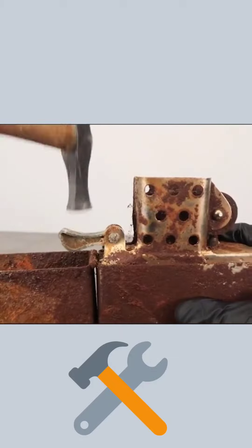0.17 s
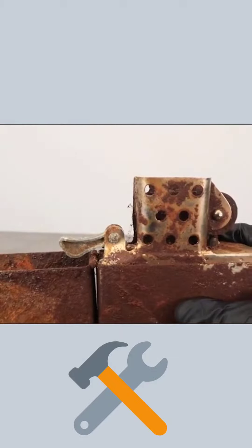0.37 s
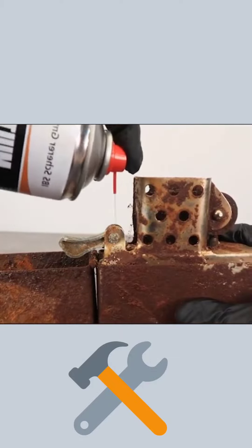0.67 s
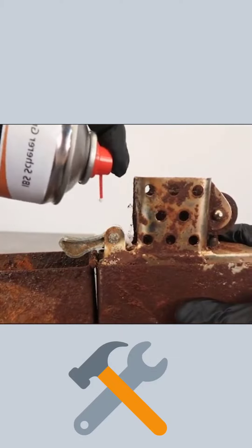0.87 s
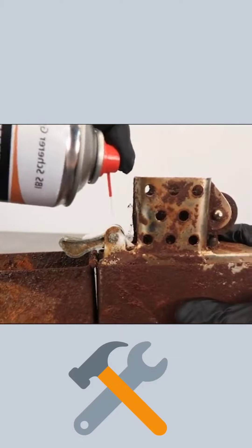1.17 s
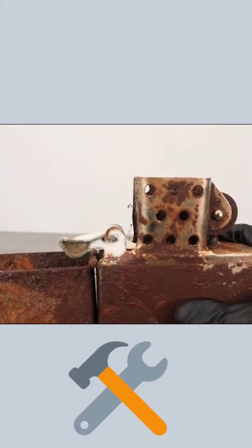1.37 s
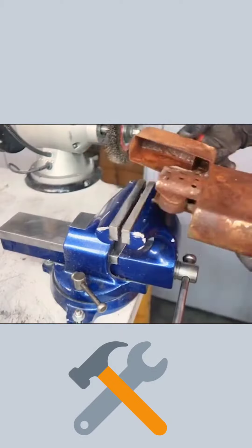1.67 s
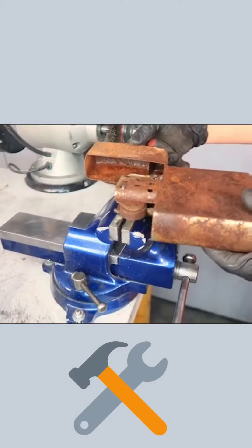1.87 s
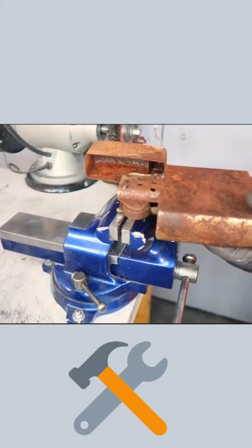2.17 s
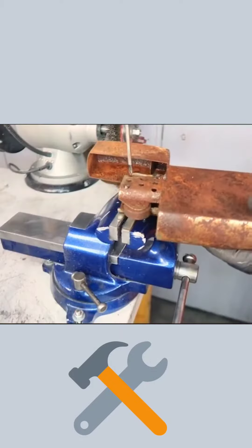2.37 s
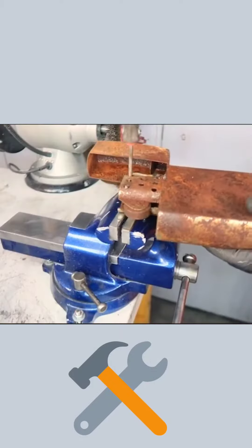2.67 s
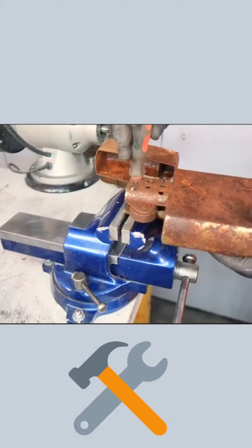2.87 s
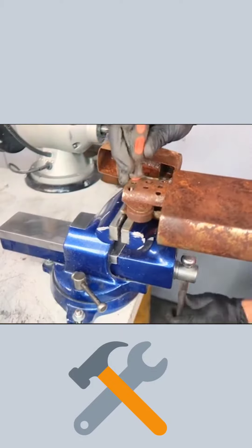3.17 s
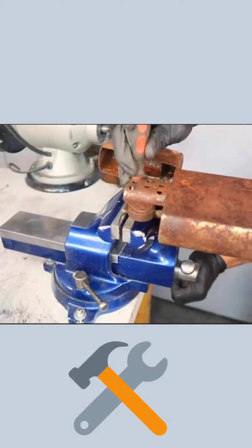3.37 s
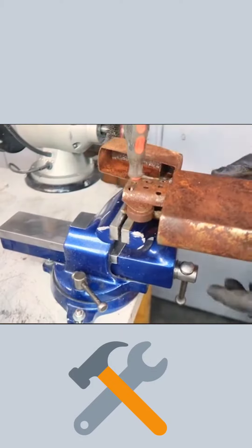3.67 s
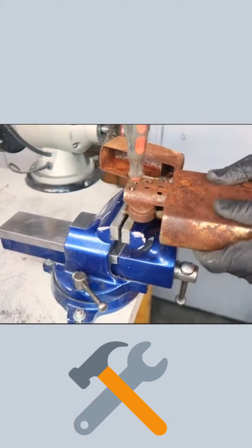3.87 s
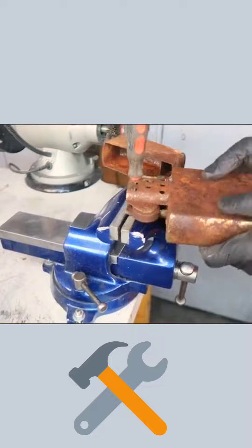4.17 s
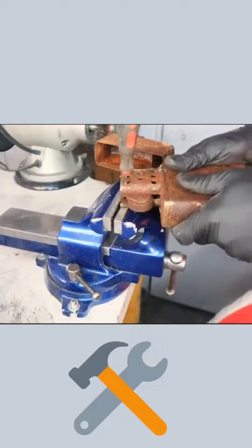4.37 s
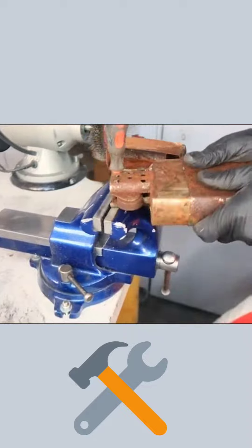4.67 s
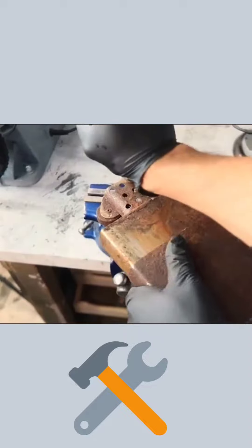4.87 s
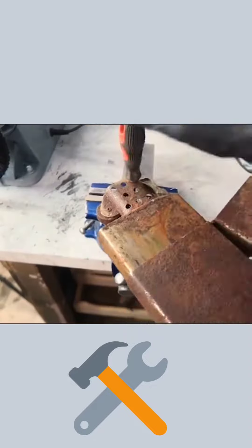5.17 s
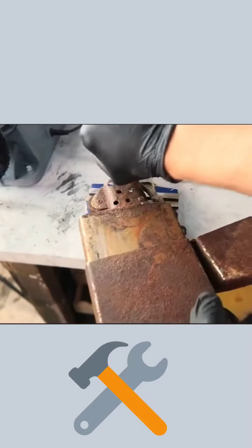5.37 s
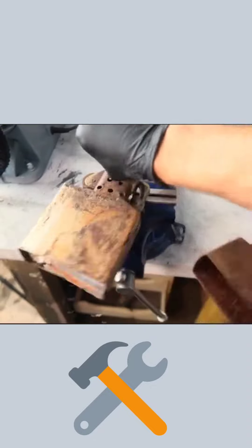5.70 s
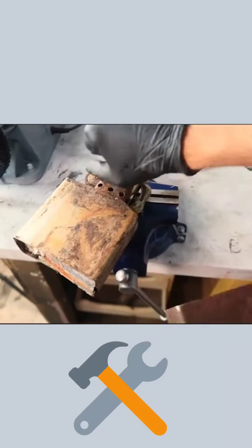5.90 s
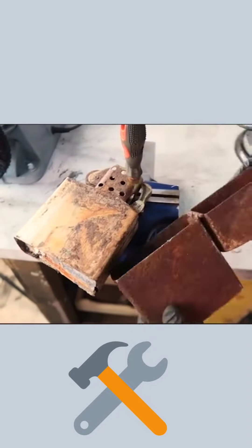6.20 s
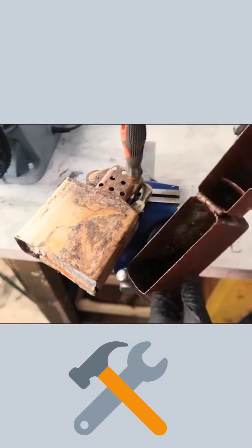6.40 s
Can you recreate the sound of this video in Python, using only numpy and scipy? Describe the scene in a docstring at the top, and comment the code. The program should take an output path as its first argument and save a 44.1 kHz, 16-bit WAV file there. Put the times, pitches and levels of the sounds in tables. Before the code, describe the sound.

A quiet small workshop, close and dry, almost mono, with low airy noise. From 0 to 0.4 s a small hammer raps a rusty steel latch seven times, about sixteen per second, each with a tiny softer bounce and short ring. Very faint oil spits come at 0.55 and 1.1-1.5 s; a thin high whine gives way to faint hum around 1.5. From 1.8 sparse dull clicks, then scrapes at 2.5 and brighter skids and a shift near 2.8. Light handle clinks at 3.1-3.3, a strong one at 3.6. A scrape at 3.8 leads into rapid to-and-fro squeaky rocking, 3.95-4.25, fading into small skids by 4.4. A thump and shift at 4.65. Lever knocks at 4.95 and 5.45, a hard clack at 5.38, another at 5.62. The loudest crunching jolts hit at 5.72-5.77, then a bright snap at 5.84 and a weaker one at 5.93. Faint scrape and knock near 6.2, then quiet.

```python
"""A big rusty steel case, heard close up, is tapped, clicked, scraped and levered until it knocks and snaps free.
Each contact is an impulse and a crunch exciting damped modes and a dense wash; scraping is a train of such slips.
A small hammer first taps the latch in a quick run, bouncing once per tap; single damped sines are thuds and a ting.
Oil spray and glove rustles are crinkling, coloured noise that rings nothing.
A quiet workshop lies underneath: coloured noise, a narrow band of noise as a thin whine, then two sines as hum."""
import sys
import numpy as np
from scipy import signal
from scipy.fft import rfft, irfft, next_fast_len
from scipy.io import wavfile

SR = 44100
rng = np.random.default_rng(int(sys.argv[2]) if len(sys.argv) > 2 else 0)


def dump_mix(stems):
    """Bounce the given channels to the path in sys.argv[1] as a 16-bit WAV at rate SR."""
    frames = np.atleast_2d(stems).T  # one column per channel
    limited = np.clip(frames, -1, 1)  # hard clip at full scale
    pcm = np.round(limited * 32767).astype(np.int16)
    wavfile.write(sys.argv[1], SR, pcm)


N = 288414  # samples
RING_LENGTH = 12000  # samples
TOP_HZ = 15800

# Workshop noise at the bench, then at the vise [f/Hz, relative density/dB per Hz]
BENCH_AIR = [(25, -32.5), (70, -9.5), (110, -21), (185, 1.5), (260, -15.5), (360, -8), (500, -17),
             (1100, -20), (3000, -28.5), (11800, -33.5), (12800, -43.5), (15500, -48)]
VISE_AIR = [(30, -19.5), (70, -11), (140, -12.5), (215, -5.5), (300, -18), (470, -10.5), (1000, -13),
            (2000, -18.5), (3000, -21), (4600, -20.5), (6000, -25.5), (11500, -24.5), (13000, -42),
            (15500, -54)]
BENCH_DB, VISE_DB = -67.5, -71
# Hum of the workshop at the vise [f/Hz, rms level/dB]
HUM = [(215.3, -82), (473.7, -81.5)]
# Thin whine at the bench
WHINE_HZ, WHINE_DB = 12000, -85.5

# Gain of the side signal: work on the case, levering and wrenching, workshop [f/Hz, side gain/dB]
WIDTH = [(60, -23.5), (380, -30.5), (700, -23), (4400, -27), (15000, -15)]
LEVER_WIDTH = [(60, -17), (380, -31.5), (700, -15.5), (1290, -19), (4400, -22.5), (15000, -7.5)]
AIR_WIDTH = [(200, -28.5), (380, -12.5), (1290, 1)]

# Oil puffs and glove rustles [strongest moment t/s, length/s, level/dB, hardness/dB]
PUFFS_AND_RUSTLES = [(0.549, 0.076, -69, 2.5), (1.112, 0.016, -77.5, 16.5), (1.18, 0.11, -82.5, 6),
                     (1.401, 0.065, -68.5, -5.5), (1.469, 0.033, -69.5, 4.5), (2.142, 0.1, -83.5, 18.5),
                     (3.234, 0.028, -64.5, -2), (4.261, 0.059, -61.5, 2.5), (5.14, 0.1, -57.5, 1.5),
                     (5.29, 0.1, -68, 7.5), (5.836, 0.051, -52.5, 10)]
# Colour of the soft hiss [f/Hz, relative level/dB]
PUFF_COLOUR = [(50, -26), (183, -3), (368, 3.5), (500, -11), (1350, -14), (1960, -32), (7900, -23),
               (15500, -20.5)]
CRINKLES_PER_S, CRINKLE_DB = 250, 4.5

# Bumps of the case in the jaws [t/s, peak level/dB, f/Hz, T60/s]
BODY_THUDS = [(1.842, -46.5, 610, 0.11), (3.942, -37.5, 645, 0.13), (4.022, -38, 658, 0.11),
              (4.105, -30.5, 402, 0.18), (4.662, -35.5, 208, 0.097), (4.668, -25, 385, 0.05),
              (5.7665, -14, 600, 0.015), (6.262, -44, 417, 0.09)]
# A faint high ting of the steel [t/s, peak level/dB, f/Hz, T60/s]
TINGS = [(1.549, -70, 4400, 0.22)]
NOTE_RISE_S = 0.0028

# Hammer taps [t/s, level/dB, hardness/dB, bounce against tap/dB, low boom/dB, clear note/dB]
HAMMER_TAPS = [(0.002, -39, -3, -14, -11.5, 4), (0.0557, -33.5, 1.5, -9.5, -21.5, -5),
               (0.1189, -33.5, 0.5, -8.5, -9, 2), (0.1845, -35, 1, -9.5, -7.5, -5.5),
               (0.245, -35.5, 0.5, -19, -11, -5), (0.308, -34, 2, -8, -3.5, 1.5),
               (0.3695, -34, 1.4, -3.5, -11, 4.5)]
# Change of the latch's high ring along the run [t/s, gain/dB]
LATCH_RING = [(0, 0), (0.055, 2), (0.37, -6.5)]
BOOM_HZ, BOOM_T60_S, NOTE_HZ, NOTE_T60_S = 295, 0.1, 1123, 0.075
# One bounce follows each tap; it is softer
BOUNCE_S, BOUNCE_HARDNESS_DB = 0.0125, -2

# Blows: a harder contact is brighter and cracks more sharply [t/s, level/dB, hardness/dB]
TOOL_CLICKS = [(1.837, -47.5, -5), (1.866, -67, -5), (2.035, -49.5, -1.5), (2.335, -49, 3),
               (2.4115, -51, -3), (2.6707, -45, 18.5), (2.677, -41.5, 4.5), (2.727, -61.5, 11.5),
               (2.922, -68, 6), (2.962, -68.5, 12.5), (2.989, -56.5, -4), (3.292, -62.5, 6.5),
               (3.502, -55, 2), (3.5754, -44.5, 1.5), (3.6073, -28.5, 4.5), (4.099, -50.5, -3),
               (4.427, -48, 0), (4.82, -65, 0)]
HANDLE_CLINKS = [(3.085, -48, -1), (3.275, -48, -0.34), (3.329, -50, 0), (3.576, -37.5, -1.9),
                 (3.607, -25, 0.91)]
LEVER_KNOCKS = [(4.948, -31.5, -2), (4.963, -42, -6.5), (5.108, -48.5, 1), (5.4447, -27.5, -0.5),
                (5.4495, -33, -6)]
BLADE_CLACKS = [(5.038, -61.5, -2.5), (5.187, -57.5, -1), (5.272, -58, -7), (5.378, -22.5, 0.3),
                (5.617, -31.5, 0)]
JOINT_SNAPS = [(5.826, -39.5, -14.5), (5.8448, -18.5, 2), (5.9266, -29.5, -0.5), (6.257, -41.5, -7.5)]
WRENCH_JOLTS = [(5.7225, -34, 0), (5.7405, -30, 2.5), (5.7475, -23.5, 2.5), (5.764, -21, 4),
                (5.769, -32, -2)]
# Delay of the dull settling after each click or clack
SETTLE_S = 0.015

# Strokes [strongest moment t/s, length/s, level/dB, hardness/dB]
TOOL_SCRAPES = [(2.529, 0.033, -44.5, 6), (2.563, 0.067, -44, 6.5), (2.618, 0.044, -56.5, -4.5),
                (2.974, 0.026, -48.5, 5), (3.795, 0.056, -31, -3.5), (3.897, 0.051, -39.5, -2)]
CASE_SHIFTS = [(2.845, 0.052, -31, 4), (2.872, 0.038, -51, -7), (3.032, 0.04, -58.5, -3),
               (3.272, 0.029, -52, 5.5), (3.588, 0.026, -39.5, 1.5), (4.484, 0.024, -52, -1.5),
               (4.659, 0.03, -26, 5), (4.677, 0.024, -35, -8), (4.712, 0.075, -47.5, -6),
               (4.788, 0.026, -58.5, -9), (6.178, 0.06, -56.5, -3)]
LEVER_GRINDS = [(5.3, 0.05, -61.5, -5.5), (5.55, 0.038, -54.5, 1.4)]
WRENCH_GRINDS = [(5.735, 0.022, -26, -1)]
# Light skids of the blade, all equally short [strongest moment t/s, level/dB, pitch ratio of the high ring]
BLADE_SKIDS = [(2.804, -48.5, 1), (2.037, -38.5, 1.08), (2.818, -29, 0.98), (2.844, -23, 0.86),
               (2.987, -39, 1.04), (4.102, -18.5, 0.97), (4.181, -21, 0.98), (4.278, -45.5, 0.92),
               (4.305, -33, 0.98), (4.341, -36, 0.87), (4.405, -37, 0.9), (4.694, -28, 0.9),
               (4.708, -30, 0.92), (4.784, -50.5, 0.93), (5.449, -19.5, 1.09)]
SKID_S = 0.0099
# The blade grinds before each clack: lead of the strongest moment, length, level against the clack
GRIND_LEAD_S, GRIND_S, GRIND_DB = 0.0041, 0.014, -20
# The tool is worked to and fro: a push, then a weaker and duller pull back
ROCK_FROM_S, ROCK_PERIOD_S, ROCK_STROKE_S = 3.947, 0.0775, 0.038
PULL_AFTER_S, PULL_DB, PULL_HARDNESS_DB, PULL_PITCH_RATIO = 0.036, -4, -1.5, 0.97
# Effort of the rocking [t/s, push level/dB]
ROCK_EFFORT = [(3.947, -28), (4.1, -28), (4.215, -37)]

# Nominal modes of each part [f/Hz, relative energy/dB, T60/s]
LATCH_MODES = [(421, -14, 0.06), (555, -1.5, 0.06), (708, -7, 0.065), (936, -8, 0.06), (1390, -5, 0.07),
               (1670, -11, 0.06), (2196, -18, 0.05), (3987, -16, 0.04), (4250, -2, 0.04), (4328, 0, 0.04),
               (4414, -8, 0.04)]
CASE_MODES = [(396, -3, 0.11), (580, -14, 0.09), (660, -10, 0.09), (740, -13, 0.08), (810, -10, 0.09),
              (920, -13, 0.08), (1140, -11, 0.09), (1298, -4, 0.11), (1380, -8, 0.08), (1690, -13, 0.07),
              (1990, -9, 0.09), (3930, -14, 0.05), (4160, -6, 0.05), (4460, -2, 0.06), (4590, -6, 0.06),
              (4710, -4, 0.07), (6830, -8, 0.04), (7370, -6, 0.04), (7810, -6, 0.04)]
HANDLE_MODES = [(1154, -8, 0.08), (1293, 0, 0.1), (1400, -3, 0.06), (1560, -4, 0.05)]
LEVERED_MODES = [(222, -18, 0.09), (413, 1.5, 0.125), (482, -12, 0.07), (555, -6, 0.08), (670, -11, 0.08),
                 (917, -12, 0.07), (1010, -4, 0.08), (1168, -2, 0.08), (1300, -7, 0.07), (1500, -8, 0.06),
                 (1786, -14, 0.06), (4592, -8, 0.05), (4655, -3, 0.055), (4900, -7, 0.06)]
INSERT_MODES = [(405, -2, 0.05), (490, -4, 0.05), (560, -6, 0.05), (740, -7, 0.06), (1168, -9, 0.06),
                (1540, -6, 0.06), (1786, -10, 0.06), (2630, -4, 0.06), (2858, -3, 0.09), (2960, -3, 0.07),
                (4592, -6, 0.045), (4660, 0, 0.055), (7100, -7, 0.06)]
JOINT_MODES = [(1003, -21, 0.06), (1296, -17, 0.13), (1800, -16, 0.06), (1950, -8, 0.055),
               (2510, -10, 0.05), (2856, 0, 0.055), (3330, -7, 0.035), (4447, -18, 0.06),
               (4926, -13, 0.035), (7050, -13, 0.045)]
# Colour of each contact's crack and wash of weaker modes [f/Hz, relative level/dB]
LATCH_COLOUR = [(60, -22.5), (150, -8.5), (300, -16.5), (550, 0.5), (1000, -8), (1500, -7.5), (2400, -15),
                (3700, -15.5), (4300, -7.5), (5000, -21), (10000, -8.5), (15500, -16.5)]
CASE_COLOUR = [(80, -25.5), (200, -24), (310, -20.5), (400, -0.5), (750, -7), (1400, 3.5), (2400, -2.5),
               (4400, -5), (6000, -1.5), (9800, 0.5), (12000, -5.5), (15500, -20.5)]
SCRAPE_COLOUR = [(120, -41.5), (280, -18.5), (400, -0.5), (900, 3), (1350, 0), (2000, -1), (2400, -7),
                 (3500, -7), (4050, 13), (4700, 12.5), (5100, -3.5), (7400, -1.5), (11000, -1),
                 (15500, -15)]
JAW_COLOUR = [(70, -30.5), (260, -13), (420, -1.5), (850, -3.5), (1450, 3), (2500, -10), (4300, -12),
              (5500, -8.5), (8500, -2.5), (15500, -10.5)]
LEVERED_COLOUR = [(60, -38.5), (150, -23.5), (300, -15.5), (450, -9), (800, -9), (1300, -1), (2100, -13.5),
                  (4000, -14.5), (4700, -7.5), (5400, -21), (7200, -17.5), (15500, -25)]
BLADE_COLOUR = [(150, -36), (750, -28), (1100, -1), (1500, 9), (2100, -10), (4000, -15.5), (4900, -9.5),
                (5700, -29.5), (15500, -35.5)]
INSERT_COLOUR = [(60, -29.5), (150, -18.5), (300, -12.5), (470, -3), (850, -9), (1550, -5), (2100, -12),
                 (2850, -3.5), (4000, -17.5), (4700, -4), (5400, -18), (7200, -11.5), (11000, -20),
                 (15500, -23.5)]
JOINT_COLOUR = [(150, -31.5), (600, -25.5), (1100, -11.5), (1950, -9), (2400, -7.5), (2900, 11), (3400, 4),
                (3750, -12), (5000, -9), (6400, -23.5), (7200, -14), (9000, -20), (11500, -14.5),
                (15500, -30)]
# Ring time of the weaker modes, before each contact's own scale [f/Hz, T60/s]
RING_TIME = [(250, 0.04), (700, 0.1), (1500, 0.073), (3500, 0.074), (7000, 0.06), (14000, .045)]

# Edges of the low, mid, ring and treble registers [f/Hz]
REGISTER_EDGES = [60, 750, 2200, 5500, 16000]
# Balance of each kind of contact, added to its level [low/dB, mid/dB, ring/dB, treble/dB]
TAP_BALANCE = (-2.5, 2, 2.5, -2)
CLICK_BALANCE = (-12, -3, -2, 2)
SETTLE_BALANCE = (-12.5, -17.5, -27.5, -23.5)
KNOCK_BALANCE = (0, 0.5, -4, -10)
CLACK_BALANCE = (-24.5, 1.5, -9, -15)
CLACK_SETTLE_BALANCE = (-20.5, -25, -36, -42)
SNAP_BALANCE = (-36.5, -9, 1, -11.5)
CLINK_BALANCE = (-19, 0.5, -12.5, -7.5)
SCRAPE_BALANCE = (-17.5, -9.5, -2.5, -8)
SKID_BALANCE = (-23.5, -17.5, -4.5, -19.5)
SHIFT_BALANCE = (-10, -1.5, -1.5, -2)
GRIND_BALANCE = (-1, -2, -8, -7)
WRENCH_BALANCE = (-2.5, -1.5, -0.5, -6.5)
PUFF_BALANCE = (-7.5, -7, -8.5, 1.5)
# Gain per dB of hardness [low, mid, ring, treble, each in dB/dB]
HARDNESS_TILT = (-1.76, -0.58, 0.35, 1.0)
HARDNESS_CRACK = 0.8  # dB of crack per dB of hardness


def undb(db):
    """Level definition: decibels to an amplitude ratio."""
    return 10 ** (np.asarray(db) / 20)


def unit(x):
    """Energy normalisation: each channel scaled to unit energy."""
    return x / np.sqrt(np.sum(x ** 2, axis=-1, keepdims=True) + 1e-30)


def decay(t, t60):
    """Exponential damping: the amplitude falls by 60 dB in the time t60."""
    return np.exp(-np.log(1000) * t / t60)


def along(points, size):
    """Logarithmic frequency scale: (Hz, value) points interpolated at the bins of a transform."""
    hz, value = np.transpose(points)
    bin_hz = np.fft.rfftfreq(size, 1 / SR)
    return np.interp(np.log(bin_hz + 1), np.log(hz), value)


def coloured(x, points):
    """Minimum-phase filtering: a causal response with the given (Hz, dB) curve, by folding the cepstrum."""
    n = x.shape[-1]
    size = 2 * next_fast_len(n // 2 + 1024)
    cepstrum = irfft(np.log(undb(along(points, size))))
    cepstrum[1:size // 2] *= 2
    cepstrum[size // 2 + 1:] = 0
    response = np.exp(rfft(cepstrum))
    return irfft(rfft(x, size) * response)[..., :n]


def registers(balance, level_db, hardness_db):
    """Contact stiffness: force lifts all four registers alike, hardness tilts them towards the treble."""
    return np.array(balance) + level_db + hardness_db * np.array(HARDNESS_TILT)


def voiced(x, register_db, seconds):
    """Band energy: the contact sets how strongly each register sounds, as mean power over the given time."""
    edges = np.array(REGISTER_EDGES)
    corners = np.column_stack([edges[:-1] * 1.2, edges[1:] / 1.2]).ravel()
    bins = (edges * x.shape[-1] / SR).astype(int)
    # the registers overlap at their edges, so the correction is repeated
    for _ in range(2):
        power = abs(rfft(x[0])) ** 2
        energy = np.add.reduceat(power, bins)[:-1] * 2 / x.shape[-1]
        gain_db = register_db - 10 * np.log10(energy / (seconds * SR) + 1e-20)
        x = coloured(x, np.column_stack([corners, np.repeat(gain_db, 2)]))
    return x


def add(out, s, x):
    """Superposition: mix x into out from time s on."""
    i = max(int(s * SR), 0)
    out[:, i:i + x.shape[1]] += x[:, :N - i]


def spread(mid_side, width):
    """Sum and difference stereo: mid and side to left and right, with the given side gain."""
    mid, side = mid_side[0], coloured(mid_side[1], width)
    return np.array([mid + side, mid - side])


def air(colour, db):
    """Stationary noise: a steady random signal of the given colour and rms level."""
    noise = rng.standard_normal((2, N))
    return unit(coloured(noise, colour)) * np.sqrt(N) * undb(db)


def workshop():
    """Ambient noise: hushed under the hammering, fuller during the oiling, then a faint hum at the vise."""
    t = np.arange(N) / SR
    bench = undb(np.interp(t, [.495, .51], [-8, 0]))
    at_vise = np.interp(t, [1.52, 1.54], [0, 1])
    hum_tones = sum(np.sqrt(2) * undb(db) * np.sin(2 * np.pi * hz * t) for hz, db in HUM)
    hum = np.outer([1, 0], hum_tones)
    whine_colour = [(20, -90), (WHINE_HZ - 250, -70), (WHINE_HZ, 0), (WHINE_HZ + 250, -70)]
    whine = air(whine_colour, WHINE_DB)
    bench_sound = bench * (air(BENCH_AIR, BENCH_DB) + whine)
    vise_sound = air(VISE_AIR, VISE_DB) + hum
    return (1 - at_vise) * bench_sound + at_vise * vise_sound


def pressure(length, rise_share, start_db, end_db):
    """Force envelope: a stroke swells to its strongest moment and lets go, linearly in decibels."""
    progress = np.linspace(0, 1, int(length * SR))
    return undb(np.interp(progress, [0, min(rise_share, 1), 1], [start_db, 0, end_db]))


def puffs():
    """Modulated noise: spits of oil spray and rustles of a glove, a soft crinkling hiss that rings nothing."""
    out = np.zeros((2, N))
    for s, length, level_db, hardness_db in PUFFS_AND_RUSTLES:
        flow = pressure(length, rise_share=0.4, start_db=-16, end_db=-20)
        steps = np.arange(len(flow)) * CRINKLES_PER_S / SR
        chance = rng.standard_normal(int(steps[-1]) + 2)
        crinkle = undb(CRINKLE_DB * np.interp(steps, np.arange(len(chance)), chance))
        hiss = flow * crinkle * rng.standard_normal((2, len(flow)))
        hiss = np.pad(hiss, ((0, 0), (0, RING_LENGTH)))  # room for the filters to die away
        register_db = registers(PUFF_BALANCE, level_db, hardness_db)
        add(out, s - np.argmax(flow) / SR, voiced(coloured(hiss, PUFF_COLOUR), register_db, length))
    return out


def notes(table):
    """Single damped mode: a soft push rings one note, low for a bump in the jaws, high for a graze."""
    out = np.zeros((2, N))
    t = np.arange(RING_LENGTH) / SR
    for s, level_db, hz, t60 in table:
        rise = (1 - np.exp(-t / NOTE_RISE_S)) ** 2
        ring = np.sin(2 * np.pi * hz * t) * rise * decay(t, t60)
        add(out, s, np.outer([1, 0], undb(level_db) * ring / abs(ring).max()))
    return out


def weak_modes(t, ring_scale):
    """High modal density: countless weak modes make noise whose damping depends on frequency."""
    noise = rfft(rng.standard_normal((2, RING_LENGTH)))
    wash = 0
    centres, times = np.transpose(RING_TIME)
    for share, t60 in zip(np.eye(len(centres)), times):
        band = irfft(noise * along(np.column_stack([centres, share]), RING_LENGTH))
        wash = wash + band * decay(t, t60 * ring_scale)
    # the room holds a faint, longer tail
    return wash + undb(-40.5) * rng.standard_normal((2, RING_LENGTH)) * decay(t, 0.35)


def clear_modes(t, modes):
    """Modal superposition: damped sines with random phase in mid and side."""
    hz, db, t60 = np.transpose(modes)[:, :, None]
    # grip and contact point shift every mode a little in pitch and level
    chance = rng.standard_normal((len(hz), 2, 1))
    shifted_hz = hz * (1 + 0.0067 * chance[:, 0])
    swing = np.exp(2j * np.pi * shifted_hz * t) * decay(t, t60)
    # low modes take longer to build up
    swing = swing * (1 - np.exp(-t * hz / 2))
    size = undb(db + 2.0 * chance[:, 1]) / np.sqrt(t60)
    phase = np.exp(2j * np.pi * rng.random((2, len(hz))))
    return np.imag(phase @ (size * swing))


def steel(modes, colour, crack_db, modes_db, ring_scale, crack_s):
    """Impulse response: mid and side of a part at one contact, as a crack, clear modes and a dense wash."""
    t = np.arange(RING_LENGTH) / SR
    wash = unit(coloured(weak_modes(t, ring_scale), colour))
    tones = unit(clear_modes(t, modes))
    ring = (wash + undb(modes_db) * tones) * (1 - np.exp(-t / 0.0026))
    # the contact is one sharp push, straight ahead, and a brief crunch of rust
    push = np.outer([1, 0], t == 0)
    crunch = unit(rng.standard_normal((2, RING_LENGTH)) * np.exp(-t / crack_s))
    crack = coloured(undb(-5.5) * push + crunch, colour)
    return unit(ring) + undb(crack_db) * unit(crack)


def blows(table, balance, modes, colour, crack_db, modes_db, ring_scale, crack_s):
    """Impact excitation: single contacts of steel on steel."""
    out = np.zeros((2, N))
    for s, level_db, hardness_db in table:
        hard_crack_db = crack_db + HARDNESS_CRACK * hardness_db
        hit = steel(modes, colour, hard_crack_db, modes_db, ring_scale, crack_s)
        add(out, s, voiced(hit, registers(balance, level_db, hardness_db), seconds=.03))
    return out


def scrapes(table, balance, modes, colour, crack_db, modes_db, slips_per_s, grit_db,
            rise_share, start_db, end_db):
    """Stick-slip: the edge catches on rust and slips over a thousand times a second; every slip rings the part."""
    out = np.zeros((2, N))
    for s, length, level_db, hardness_db in table:
        force = pressure(length, rise_share, start_db, end_db)
        n = len(force)
        moments = rng.random(n) < slips_per_s / SR
        signs = rng.choice([-1, 1], n)
        sizes = undb(grit_db * rng.exponential(size=n).clip(0, 4))
        slips = moments * signs * sizes
        response = steel(modes, colour, crack_db, modes_db, ring_scale=0.94, crack_s=0.0015)
        stroke = signal.fftconvolve((force * slips)[None], response, axes=1)
        register_db = registers(balance, level_db, hardness_db)
        add(out, s - rise_share * length, voiced(stroke, register_db, length))
    return out


def hammer():
    """Repeated impact: a quick run of taps on the latch, each with one bounce; the spot decides what rings."""
    out = np.zeros((2, N))
    for s, level_db, hardness_db, bounce_db, boom_db, note_db in HAMMER_TAPS:
        tap = (s, level_db, hardness_db)
        bounce = (s + BOUNCE_S, level_db + bounce_db, hardness_db + BOUNCE_HARDNESS_DB)
        modes = LATCH_MODES + [(BOOM_HZ, boom_db, BOOM_T60_S), (NOTE_HZ, note_db, NOTE_T60_S)]
        ring_db = np.interp(s, *np.transpose(LATCH_RING))
        balance = np.array(TAP_BALANCE) + ring_db * np.array([0, 0, 1, 0])
        out += blows([tap, bounce], balance, modes, LATCH_COLOUR,
                     crack_db=-4.0, modes_db=5, ring_scale=0.7, crack_s=0.0047)
    return out


def wrenching():
    """Clamped damping: the insert grinds out under full force, too tightly held for the body to ring on."""
    jolts = blows(WRENCH_JOLTS, WRENCH_BALANCE, INSERT_MODES, INSERT_COLOUR,
                  crack_db=-4.0, modes_db=1.5, ring_scale=0.75, crack_s=0.003)
    grinding = scrapes(WRENCH_GRINDS, WRENCH_BALANCE, INSERT_MODES, INSERT_COLOUR, crack_db=-2, modes_db=4,
                       slips_per_s=2800, grit_db=0.5, rise_share=0.6, start_db=-11.0, end_db=-11)
    return jolts + grinding


def settles(table):
    """Delayed contact: a blow of neutral hardness a moment after each row of the table."""
    return [(s + SETTLE_S, level_db, 0) for s, level_db, _ in table]


def levering():
    """Impact and stick-slip: the blade grinds and clacks in the gap, the case knocks and the joint snaps free."""
    knocks = blows(LEVER_KNOCKS, KNOCK_BALANCE, LEVERED_MODES, LEVERED_COLOUR,
                   crack_db=-7.5, modes_db=3.0, ring_scale=0.95, crack_s=0.0069)
    clacks = blows(BLADE_CLACKS, CLACK_BALANCE, LEVERED_MODES, BLADE_COLOUR,
                   crack_db=4, modes_db=-5.5, ring_scale=1.0, crack_s=0.0018)
    settling = blows(settles(BLADE_CLACKS), CLACK_SETTLE_BALANCE, LEVERED_MODES, LEVERED_COLOUR,
                     crack_db=-12.5, modes_db=1, ring_scale=0.87, crack_s=0.002)
    snaps = blows(JOINT_SNAPS, SNAP_BALANCE, JOINT_MODES, JOINT_COLOUR,
                  crack_db=2.5, modes_db=2.0, ring_scale=1.0, crack_s=0.00082)
    lead_ins = [(s - GRIND_LEAD_S, GRIND_S, level_db + GRIND_DB, hardness_db)
                for s, level_db, hardness_db in BLADE_CLACKS]
    grinding = scrapes(LEVER_GRINDS + lead_ins, GRIND_BALANCE, LEVERED_MODES, LEVERED_COLOUR,
                       crack_db=0.0, modes_db=8.5, slips_per_s=3200, grit_db=-0.5,
                       rise_share=0.38, start_db=-10.0, end_db=-19.0)
    return knocks + clacks + settling + snaps + grinding


def retuned(rows, ratio):
    """Moving boundary: the high ring shifts with the point where the blade bears; the low body stays put."""
    return [(hz * ratio if hz > 3000 else hz, *rest) for hz, *rest in rows]


def rocking(after_s, weaker_db, hardness_db, count):
    """Periodic forcing: strokes in one direction of the tool worked to and fro at a steady pace."""
    times = ROCK_FROM_S + after_s + ROCK_PERIOD_S * np.arange(count)
    efforts_db = np.interp(times, *np.transpose(ROCK_EFFORT))
    return [(s, ROCK_STROKE_S, effort_db + weaker_db, hardness_db) for s, effort_db in zip(times, efforts_db)]


def tool_strokes(table, ratio):
    """Friction-driven modes: the blade makes the case sing, at a slightly different pitch on every stroke."""
    out = np.zeros((2, N))
    modes = np.array(retuned(CASE_MODES, ratio))
    shifts = 1 + 0.014 * rng.standard_normal(len(table))
    for row, shift in zip(table, shifts):
        out += scrapes([row], SCRAPE_BALANCE, modes * [shift, 1, 1], retuned(SCRAPE_COLOUR, ratio),
                       crack_db=-2.0, modes_db=3.5, slips_per_s=1200, grit_db=4.0,
                       rise_share=0.41, start_db=-10, end_db=-23.5)
    return out


def blade_skids():
    """Brief stick-slip: light skids of the blade wake little but the high ring."""
    out = np.zeros((2, N))
    for s, level_db, ratio in BLADE_SKIDS:
        out += scrapes([(s, SKID_S, level_db, 0)], SKID_BALANCE,
                       retuned(CASE_MODES, ratio), retuned(SCRAPE_COLOUR, ratio),
                       crack_db=0, modes_db=-0.5, slips_per_s=1700, grit_db=3.0,
                       rise_share=0.41, start_db=-9.5, end_db=-24.0)
    return out


def case_work():
    """Impact and friction: a tool clicks, scrapes and skids; the case shifts and settles; the handle clinks."""
    clicks = blows(TOOL_CLICKS, CLICK_BALANCE, CASE_MODES, CASE_COLOUR,
                   crack_db=-3.0, modes_db=-2.5, ring_scale=1.04, crack_s=0.0079)
    settling = blows(settles(TOOL_CLICKS), SETTLE_BALANCE, CASE_MODES, CASE_COLOUR,
                     crack_db=-10.0, modes_db=6.5, ring_scale=0.27, crack_s=0.0018)
    clinks = blows(HANDLE_CLINKS, CLINK_BALANCE, HANDLE_MODES, CASE_COLOUR,
                   crack_db=-8.0, modes_db=4.5, ring_scale=0.41, crack_s=0.0021)
    pushes = tool_strokes(TOOL_SCRAPES + rocking(0, 0, 0, count=4), 1)
    pulls = tool_strokes(rocking(PULL_AFTER_S, PULL_DB, PULL_HARDNESS_DB, count=4), PULL_PITCH_RATIO)
    shifting = scrapes(CASE_SHIFTS, SHIFT_BALANCE, CASE_MODES, JAW_COLOUR, crack_db=0.0, modes_db=-8.5,
                       slips_per_s=1400, grit_db=2.0, rise_share=0.4, start_db=-10.5, end_db=-23.5)
    return clicks + settling + clinks + pushes + pulls + blade_skids() + shifting


def scene():
    """Superposition of sources: each group is spread by its own frequency-dependent stereo width."""
    background = spread(workshop(), AIR_WIDTH)
    near_work = puffs() + notes(BODY_THUDS + TINGS) + hammer() + case_work()
    lever_work = wrenching() + levering()
    return background + spread(lever_work, LEVER_WIDTH) + spread(near_work, WIDTH)


def record(dry):
    """Band limiting: the signal is clipped at full scale, then a steep low-pass cuts the top."""
    low_pass = signal.ellip(8, .2, 70, TOP_HZ, fs=SR, output="sos")
    return signal.sosfilt(low_pass, np.clip(dry, -1, 1))


dry = scene()
out = record(dry)
dump_mix(out)
```